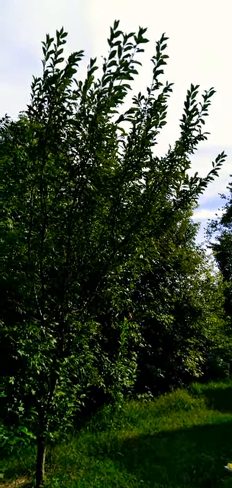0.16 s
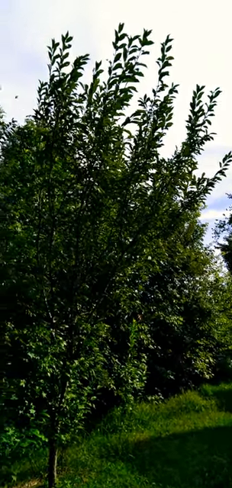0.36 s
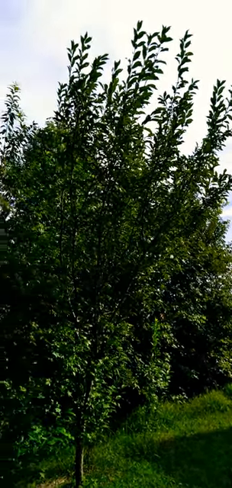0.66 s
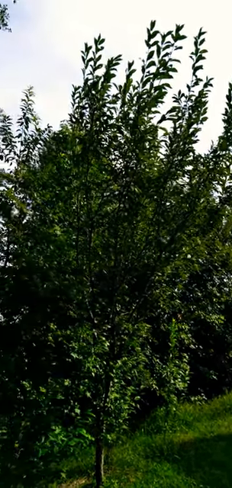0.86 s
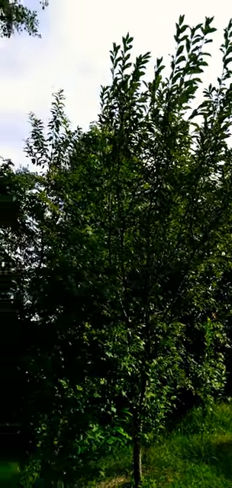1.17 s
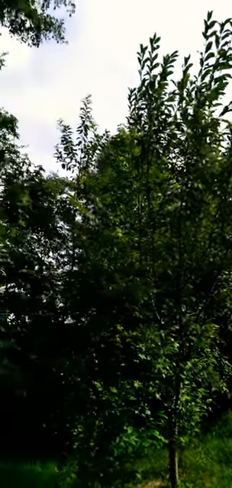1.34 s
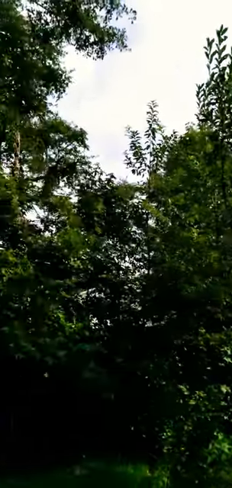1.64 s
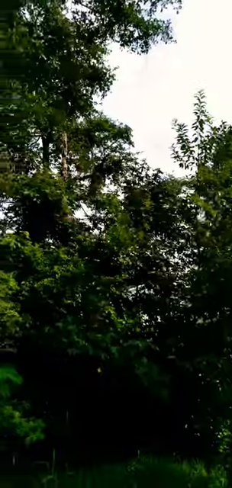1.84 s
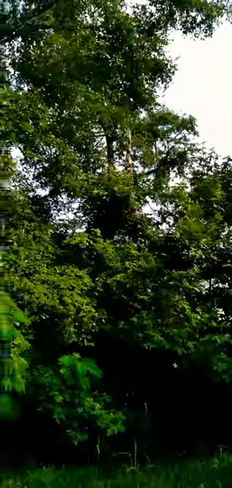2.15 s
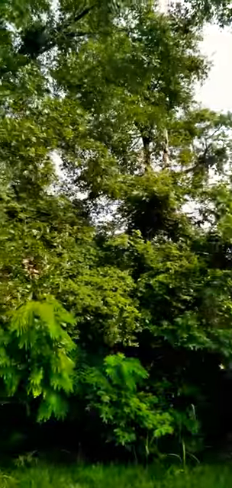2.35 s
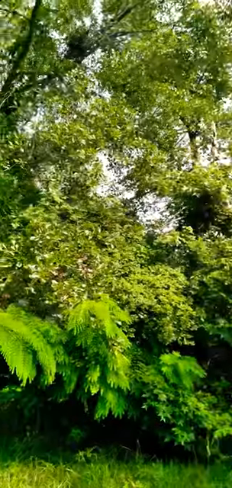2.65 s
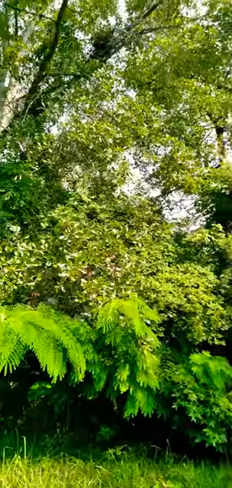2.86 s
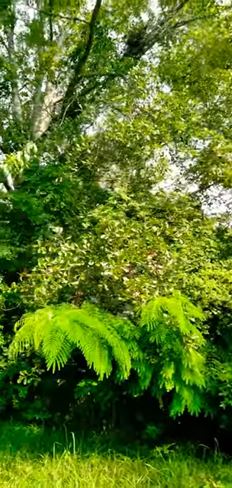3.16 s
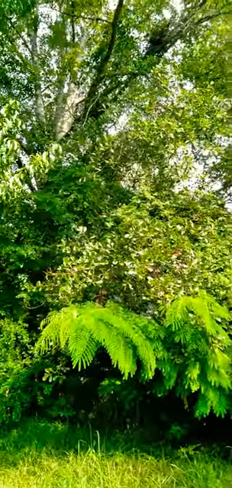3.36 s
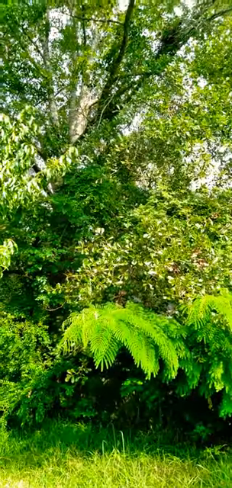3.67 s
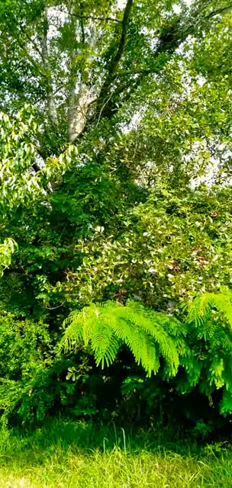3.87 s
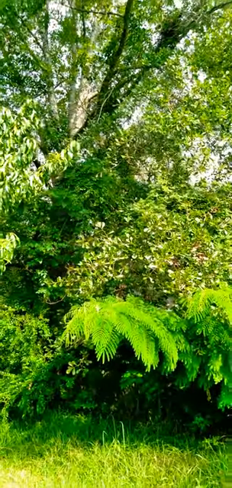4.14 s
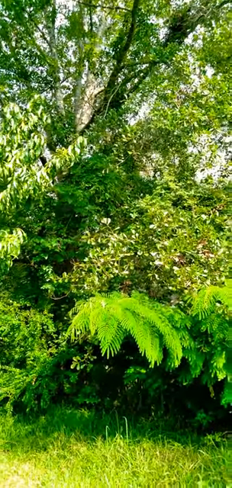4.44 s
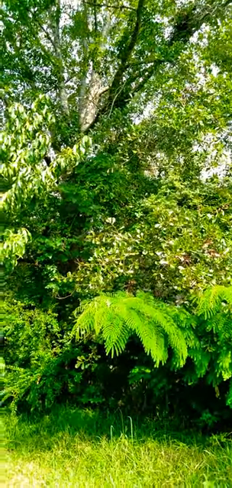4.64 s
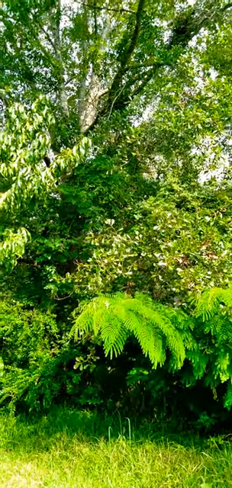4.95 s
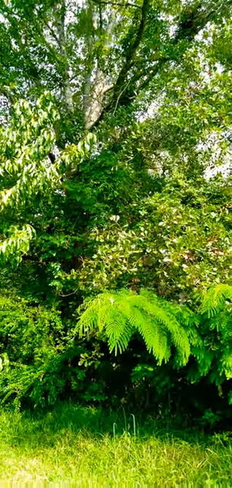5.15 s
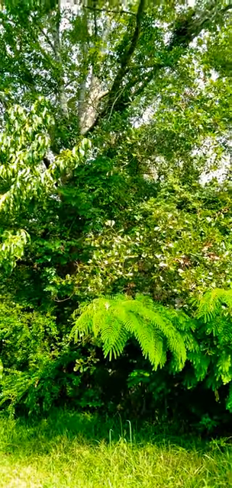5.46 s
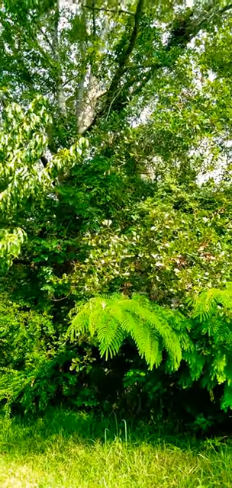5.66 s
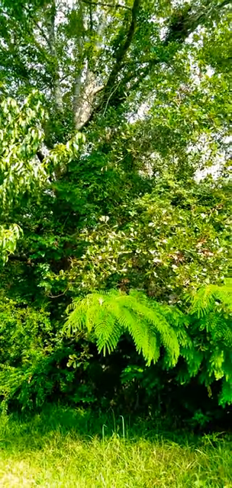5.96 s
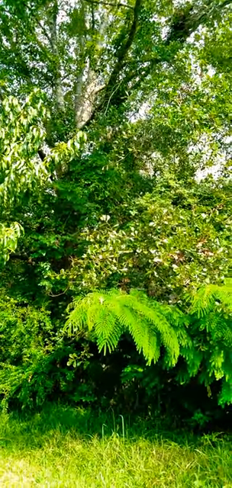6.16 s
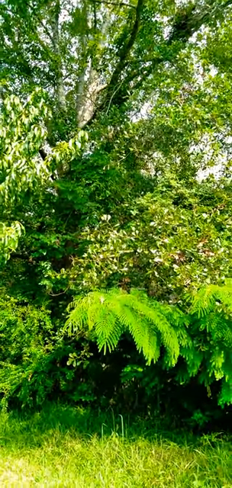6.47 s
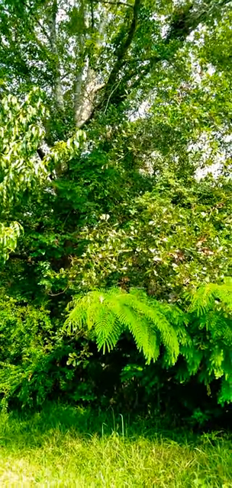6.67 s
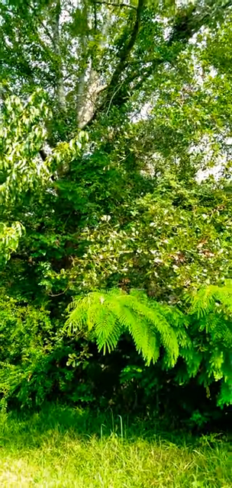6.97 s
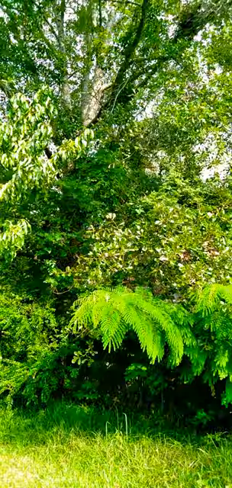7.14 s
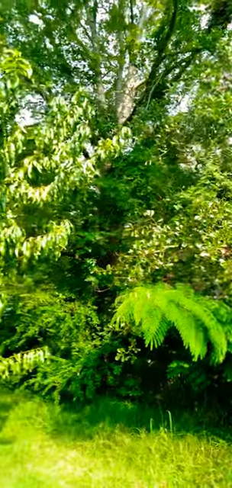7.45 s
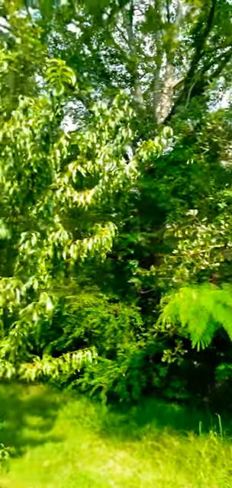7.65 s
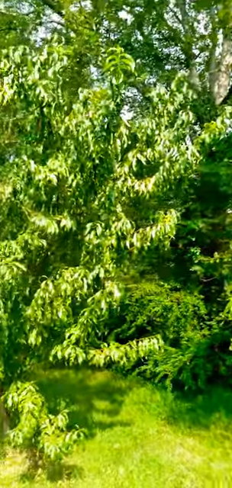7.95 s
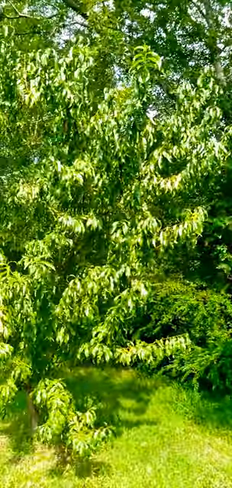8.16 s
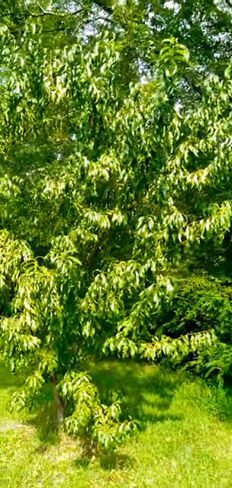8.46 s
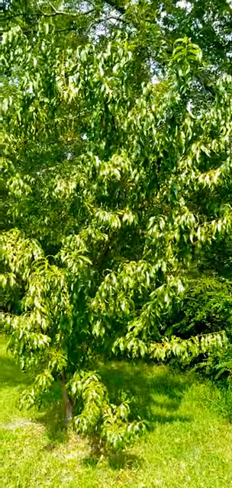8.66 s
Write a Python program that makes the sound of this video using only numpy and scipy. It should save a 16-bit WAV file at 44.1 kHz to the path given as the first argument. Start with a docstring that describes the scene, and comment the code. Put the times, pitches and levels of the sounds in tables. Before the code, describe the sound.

Cicadas buzz and pulse shrilly outdoors, with three distant dog barks, faint bird chirps and a low traffic rumble.

```python
"""A near cicada buzzes loudly over a summer lawn and stops; two shrill ones pulse on near 8 kHz,
a chorus fades behind them and a fast, even singer swells up as a pitched whine.
Their tymbal ribs buckle in trains of clicks that ring the abdomen and echo off the foliage.
Far off, a dog barks three times, a small bird chirps and traffic rumbles under the hiss of leaves."""
import sys
import numpy as np
from scipy import signal
from scipy.fft import rfft, irfft, next_fast_len
from scipy.io import wavfile
from scipy.ndimage import uniform_filter1d, map_coordinates

SR = 44100
rng = np.random.default_rng(int(sys.argv[2]) if len(sys.argv) > 2 else 0)


def wav_out(sig):
    """Save sig, one row per channel (or a flat mono array), as 16-bit PCM at SR to the path in sys.argv[1]."""
    wavfile.write(sys.argv[1], SR, np.round(np.clip(np.atleast_2d(sig).T, -1, 1) * 32767).astype(np.int16))


N = 388521

# the even singer's pace: time_s, clicks_per_s
EVEN_PACE = [(5, 250), (7.2, 250), (7.8, 249.4), (8.3, 248.8), (8.81, 248.2)]
# resonances of the second shrill singer's abdomen: pitch_hz, width_hz, gain_db
SECOND_ABDOMEN = [(8160, 139, -4), (8230, 370, -10.5)]
# hard strokes that stand out of the shrill song: time_s, peak_db
HARD_STROKES = [(3.928, -38), (4.286, -36), (5.580, -36), (5.766, -33), (5.9695, -36), (6.186, -30),
                (6.2535, -34), (7.133, -38), (7.1523, -36)]
CHORUS_PAN_DB = 7.5


def amp(db):
    """Decibels to gain."""
    return 10 ** (np.asarray(db) / 20)


def unit(x):
    """Scale to rms 1; a stereo pair by the mean of its sides."""
    return x / np.sqrt(np.mean(np.atleast_2d(x).mean(0) ** 2) + 1e-20)


def levelled(x):
    """Hold each side at a steady strength of 1, keeping its fast pulsing."""
    power = np.abs(uniform_filter1d(x ** 2, SR // 8, axis=-1))
    return x / np.sqrt(power + 1e-20)


def sides(pan_db):
    """Constant-power gains, the left pan_db above the right."""
    gains = amp(np.array([pan_db, -pan_db]) / 2).reshape(2, -1)
    return gains / np.sqrt(np.mean(gains ** 2, axis=0))


def along(points, hz):
    """Read (Hz, value) points on a log axis."""
    point_hz, values = np.transpose(points)
    return np.interp(np.log(hz + 1), np.log(point_hz + 1), values)


def clock():
    """Seconds at each sample."""
    return np.arange(N) / SR


def curves(rows):
    """One value per sample for each column after the time."""
    times, *columns = np.transpose(rows)
    return [np.interp(clock(), times, column) for column in columns]


def ramp(start, length):
    """A ramp from 0 at start to 1 after length seconds."""
    return np.clip((clock() - start) / length, 0, 1)


def fade(start, end):
    """A ramp from 1 at start to 0 at end."""
    return np.clip((end - clock()) / (end - start), 0, 1)


def bell(peak_s, spread_s):
    """A smooth hump of height 1."""
    return np.exp(-.5 * ((clock() - peak_s) / spread_s) ** 2)


def wobble(rate):
    """A smooth random curve, rate knots a second."""
    knots = rng.standard_normal(int(N * rate / SR) + 4)
    at = np.arange(0, len(knots), 1 / 10)
    return np.interp(clock() * rate, at, map_coordinates(knots, [at]))


def phase_of(hz):
    """The running phase of a moving pitch, in radians."""
    return 2 * np.pi * np.cumsum(hz) / SR


def filtered(x, response):
    """Filter x by a gain that depends on frequency."""
    size = next_fast_len(N + SR // 2)
    return irfft(rfft(x, size) * response(np.fft.rfftfreq(size, 1 / SR)), size)[..., :N]


def coloured(x, points):
    """Equalise x with a (Hz, dB) curve."""
    return filtered(x, lambda hz: amp(along(points, hz)))


def ring(x, modes):
    """Pass x through (pitch_hz, width_hz, gain_db) resonances of alternating sign."""
    return filtered(x, lambda hz: sum(
        (-1) ** k * amp(db) * 1j * hz * width / (centre ** 2 - hz ** 2 + 1j * hz * width)
        for k, (centre, width, db) in enumerate(modes)))


def band(centre_hz, width_hz):
    """Narrow noise of rms 1."""
    noise = rng.standard_normal(N)
    return unit(filtered(noise, lambda hz: np.exp(-(1.22 * (hz - centre_hz) / width_hz) ** 2)))


def rush(spectrum, likeness):
    """Stereo noise of rms 1; likeness sets how closely the sides agree at each frequency."""
    def mid_and_side(hz):
        angle = np.arccos(np.clip(along(likeness, hz), -1, 1)) / 2
        return amp(along(spectrum, hz)) * [np.cos(angle), np.sin(angle)]
    mid, side = filtered(rng.standard_normal((2, N)), mid_and_side)
    return unit(np.array([mid + side, mid - side]))


def clicks(times, sizes):
    """Impulses placed between samples."""
    at = times[:, None] * SR
    index = np.floor(at).astype(int) + np.arange(-7, 9)
    pulses = np.sinc(index - at) * np.sinc((index - at) / 8) * sizes[:, None]
    return np.bincount(np.clip(index, 0, N).ravel(), pulses.ravel(), N + 1)[:N]


def beats(rate):
    """The times at which a running rate completes each cycle."""
    turns = np.cumsum(rate * np.ones(N)) / SR
    return np.interp(np.arange(1, int(turns[-1])), turns, clock())


def foliage(x, t60, wet_db):
    """Direct sound, reaching the left first, plus echoes that change as the leaves sway."""
    t = np.arange(int((t60 + .01) * SR)) / SR
    sway = np.pi * clock() + wobble(1.986)
    out = np.array([x, np.roll(x, 4)])
    for weight in (np.cos(sway), np.sin(sway)):
        tail = rng.standard_normal((2, len(t))) * amp(-60 * t / t60)
        echoes = signal.fftconvolve(x[None], tail / np.linalg.norm(tail[0]), axes=1)[:, :N]
        out = out + amp(wet_db) * weight * echoes
    return out


def summer_air():
    """A steady bed of leaves and far insects, centred in the lows and wide in the highs."""
    # tone of the bed: frequency_hz, gain_db
    colour = [(120, -10), (200, -12), (350, -7), (550, -5.5), (1100, -6.5), (1700, -10.5), (3000, -11),
              (5000, -12.5), (7000, -17), (8100, 11.5), (9200, -1), (10500, -16.5), (12500, -23),
              (15500, -16)]
    # its stereo image: frequency_hz, left_right_likeness
    likeness = [(200, 0.94), (600, 0.96), (1200, 0.76), (2500, 0), (8000, 0)]
    return amp(-58 + .6 * wobble(2.95)) * rush(colour, likeness) * sides(1.8)


def traffic():
    """Road rumble swells with each vehicle; one far engine pulls up in pitch again and again."""
    # passing vehicles: peak_s, spread_s, rise_db
    passes = [(3.85, 0.38, 4.5), (5.95, 0.39, 9.5), (7.5, 0.21, 5), (8.28, .14, 8)]
    # engine pulls: start_s, length_s, start_hz, end_hz, level_db
    pulls = [(5.548, 0.39, 84, 100, -54), (5.832, 0.67, 105, 109.1, -56.5), (6.899, 1, 134, 138.4, -65.5),
             (7.853, 0.69, 137, 141.8, -60.5)]
    # tone of the road: frequency_hz, gain_db
    colour = [(15, -60), (27, -31), (42, -10), (58, -2.5), (90, 3.5), (130, -3), (185, -15), (230, -13),
              (330, -39), (600, -62)]
    rev_s, attack_s, release_s = 0.28, 0.17, 0.22
    rumble_db = -70 + 2 * wobble(9) + sum(db * bell(s, spread) for s, spread, db in passes)
    engine = np.zeros(N)
    for s, length, start_hz, end_hz, db in pulls:
        pitch_hz = start_hz + (end_hz - start_hz) * ramp(s, rev_s)
        phase = phase_of(pitch_hz * (1 + 0.014 * wobble(40)))
        load = ramp(s, attack_s) * fade(s + length - release_s, s + length)
        engine += amp(db + 2.0 * wobble(22)) * load * np.sin(phase)
    rumble = amp(rumble_db) * rush(colour, likeness=[(40, 0.61), (70, 0.95), (200, 0.9)])
    return rumble * sides(1.1) + engine * sides(4.8)


def bumps():
    """Soft low thuds, a few cycles each."""
    # dull thuds: peak_s, spread_s, pitch_hz, level_db
    thuds = [(5.83, 0.0054, 150, -45.5), (6.26, 0.0053, 108, -41.5), (7.09, 0.0055, 163, -59)]
    return sides(9) * sum(amp(db) * bell(s, spread) * np.sin(2 * np.pi * hz * (clock() - s))
                          for s, spread, hz, db in thuds)


def far_calls():
    """Distance smears each faint call into a soft, narrow swell."""
    # trills and hoots: start_s, length_s, pitch_hz, width_hz, level_db
    calls = [(3.13, 0.9, 3210, 120, -71), (3, 2.1, 2540, 270, -74.5), (2.96, 1.24, 1120, 260, -74),
             (6.5, 0.31, 1380, 120, -74), (8.45, 1, 785, 100, -67), (3.85, 0.303, 256, 26, -75),
             (8.08, 0.43, 226, 25, -69), (8.4, 0.63, 231, 9.2, -80)]
    out = np.zeros(N)
    for s, length, pitch_hz, width_hz, db in calls:
        swell = np.abs(np.sin(np.pi * ramp(s, length))) ** 0.4
        out += amp(db) * swell * band(pitch_hz, width_hz)
    return out * sides(7.4)


def bird():
    """Short rising whistles with a soft echo."""
    # whistles: start_s, length_s, start_hz, end_hz, relative_db
    chirps = [(5.181, 0.029, 5840, 6550, -64), (5.261, 0.035, 5880, 6240, -66),
              (5.365, 0.034, 5620, 5900, -65), (5.857, 0.036, 5880, 7700, -55.5),
              (6.52, 0.055, 7550, 7840, -51), (8.08, .05, 7150, 7750, -55)]
    out = np.zeros(N)
    for s, length, start_hz, end_hz, db in chirps:
        progress = ramp(s, length)
        pitch_hz = start_hz + (end_hz - start_hz) * progress
        out += amp(db) * np.sin(np.pi * progress) * np.sin(phase_of(pitch_hz))
    return foliage(out, t60=0.3, wet_db=5.5) * sides(3) * amp(2.0)


def dog():
    """Each far bark opens gruff and low, breaks up to a hoarse howl and echoes among the trees."""
    # barks: start_s, length_s, pitch_hz, level_db, gruff_db, hoarseness (share of pitch), rasp_db
    barks = [(2.047, 0.23, 936.5, -51, -17.5, 0.03, -7), (2.659, 0.28, 869, -52.5, -6, 0.026, -4.5),
             (4.599, 0.24, 825.3, -51.5, 5.5, .04, -2)]
    # the muzzle's bands of rasp: centre_hz, width_hz, gain_db
    muzzle = [(985, 98, -7.5), (1540, 300, -16)]
    howl_lag_s, howl_attack_s = .022, 0.024
    echo_colour = [(550, -3.0), (900, 1.0), (1800, -6)]
    rasp = sum(amp(db) * band(hz, width) for hz, width, db in muzzle)
    gruff = band(558, 84)
    out = np.zeros((2, N))
    for s, length, pitch_hz, db, gruff_db, hoarseness, rasp_db in barks:
        arch = np.abs(np.sin(np.pi * ramp(s + howl_lag_s, length)))
        phase = phase_of(pitch_hz * (.965 + .04 * arch + hoarseness * wobble(330)))
        throat = np.sin(phase) + amp(-9) * arch ** 2 * np.sin(2 * phase) + amp(rasp_db) * rasp
        howl = arch ** 0.24 * ramp(s + howl_lag_s, howl_attack_s) * throat
        opening = amp(gruff_db) * ramp(s, 0.012) * fade(s + 0.049, s + 0.17) * gruff
        early = foliage(howl + opening, t60=.2, wet_db=4)[0]
        late = foliage(early, t60=1.5, wet_db=1.0) - early
        bark = early + coloured(late, echo_colour)
        narrowed = unit(0.44 * bark + 0.21 * bark[::-1])
        out += amp(db) * np.sqrt(length * SR / N) * narrowed
    return out * sides(2.7)


def rattle(rate, jitter_s, size_db, smear_s):
    """A fast, uneven train of rib clicks; foliage smears each into a new short burst on each side."""
    times = beats(rate * (1 + .004 * wobble(6.6)))
    chance = rng.standard_normal((len(times), 2))
    energy = clicks(times + jitter_s * chance[:, 0], amp(size_db * chance[:, 1]) ** 2)
    smeared = signal.lfilter([1], [1, -np.exp(-1 / (smear_s * SR))], energy)
    return unit(np.sqrt(np.abs(smeared)) * rng.standard_normal((2, N)))


def throb(rate_hz=13.9, peak_s=1.92):
    """The slow pumping of an abdomen, between -1 and 1."""
    return np.cos(2 * np.pi * rate_hz * (clock() - peak_s))


def chorus():
    """Farther cicadas, gently throbbing and blurred by the trees, hold and then fade to a faint bed."""
    # tone of the chorus: frequency_hz, gain_db
    colour = [(2000, -26), (2700, -14.5), (3500, -13), (4000, -12), (4700, -10.5), (5150, -5), (6000, -1),
              (6800, -2.5), (7500, 2.5), (8500, -21), (9500, -14), (11000, -18.5), (12400, -15),
              (14000, -31), (15500, -63)]
    level_db = -53.5 - 14 * ramp(2.94, 2.03)
    ribs = rattle(rate=430, jitter_s=0.00031, size_db=3.5, smear_s=0.0041)
    voice = unit(coloured(ribs + amp(-1.5) * foliage(ribs[1], t60=.08, wet_db=12), colour))
    low = filtered(voice, lambda hz: hz < 5400)
    high = filtered(voice, lambda hz: hz > 8300)
    middle = voice - low - high
    pumping = amp(1.6 * fade(2.4, 3.1) * throb())
    return ((low * pumping + middle) * sides(CHORUS_PAN_DB) + high * sides(-1.5)) * amp(level_db)


def brief_rings():
    """First single cicadas in the chorus, later a shifting high sheen on the even singer's buzz."""
    # brief narrow rings: peak_s, spread_s, pitch_hz, level_db
    rings = [(1.74, .05, 6400, -56), (2.38, .06, 6200, -57), (2.7, .1, 6770, -56), (2.72, 0.053, 6200, -63),
             (2.65, .28, 5880, -63), (4.06, 0.053, 5080, -70.5), (6.5, .25, 9200, -68),
             (6.98, .15, 9900, -64), (7.3, .12, 9680, -66), (8.65, .15, 10400, -70)]
    ringing = sum(amp(db) * bell(s, spread) * band(hz, 67) for s, spread, hz, db in rings)
    return ringing * amp(2 * throb()) * sides(CHORUS_PAN_DB)


def throbber():
    """Behind the loud buzz, one cicada rings on in soft throbs and dies out."""
    ribs = rattle(rate=220, jitter_s=0.00018, size_db=-2.5, smear_s=0.0019)
    voice = levelled(ring(ribs, [(5100, 63, 5), (4600, 400, -5)]))
    return voice * amp(-60.5 + 6.3 * throb()) * bell(2.05, .46) * sides(7.4)


def whine(phase):
    """Harmonics of the click rate swell in turn; each wavers on its own path through the leaves."""
    # ringing lines: harmonic (rounded for pitch), peak_s, spread_s, level_db
    lines = [(18, 8.6, 0.11, -68), (19, 6.2, 0.42, -73.5), (19.9, 7.1, 0.19, -74), (20, 9, 0.46, -74),
             (21, 7.93, .1, -75), (23, 8.8, 0.75, -65), (24.2, 7.98, .22, -58.5), (24, 8.7, 0.18, -68),
             (25, 8.4, 0.17, -67), (25.2, 8.3, 0.3, -70), (26, 6.95, 1.7, -63), (27, 8.1, 0.65, -60),
             (28, 8.8, .55, -63.5), (37, 6.8, 0.56, -66.5), (38, 8.75, .25, -60), (42, 6.8, 1.1, -69),
             (43, 9.3, 0.7, -74), (44, 8.2, 0.57, -67), (45, 8.5, 0.65, -72)]
    # their placing: frequency_hz, left_over_right_db
    pan = [(4500, -4), (4750, -13), (6200, 3), (6500, -27), (6750, 2), (9200, -21)]
    out = np.zeros((2, N))
    for harmonic, s, spread, db in lines:
        waver = 0.12 * wobble(45) + rng.uniform(0, 2 * np.pi) + rng.normal(0, 0.66, (2, 1))
        level = amp(db + 2.5 * wobble(4.8)) * bell(s, spread)
        tone = np.sqrt(2) * np.sin(round(harmonic) * phase + waver)
        out += level * tone * sides(along(pan, harmonic * EVEN_PACE[0][1]))
    return ramp(start=5.07, length=0.85) * out


def even_singer():
    """Very regular clicks make a comb of lines; a thin whine opens into a full, smooth buzz."""
    # the rasp's swell: time_s, level_db
    swell = [(5.4, -74), (6.3, -74), (7.1, -59.5), (8.3, -59), (8.81, -54)]
    # its tone: frequency_hz, gain_db
    colour = [(3000, -40), (4500, -12.5), (5400, -5), (5900, 3), (6750, 3.5), (7300, 4.5), (9400, 3.5),
              (9750, 1.5), (10800, 6), (11300, -7.5), (11900, -32), (13000, -32), (14000, -9), (15500, -22)]
    # its placing: frequency_hz, left_over_right_db
    pan = [(4500, -12), (6000, -12), (7500, 28), (9400, -12), (11000, -7), (14000, -6)]
    rate, = curves(EVEN_PACE)
    rasp_db, = curves(swell)
    phase = phase_of(rate * (1 + 0.000423 * wobble(25)))
    ribs = rattle(rate, jitter_s=.00006, size_db=1, smear_s=.003)
    times = beats(rate * (1 + 0.000391 * wobble(25)))
    # every third click is stronger, which adds lines between the main ones
    accents = 1 + 0.99 * np.cos(2 * np.pi * np.arange(len(times)) / 3)
    ringing = unit(foliage(clicks(times, accents), t60=.05, wet_db=11.0))
    rasp = coloured(ribs + ringing, colour)
    rasp = unit(filtered(rasp, lambda hz: sides(along(pan, hz))))
    return whine(phase) + amp(rasp_db) * rasp


def strokes(rate, limp):
    """Stroke times of two tymbals that buckle in turn, a little unevenly."""
    times = beats(rate * (1 + .012 * wobble(5)))
    times = times + limp / rate * (np.arange(len(times)) % 2)
    return times + .0016 * rng.standard_normal(len(times))


def shrill(times, abdomen, gap_s, step_db, droop, wet_db, ribs):
    """Within a stroke each rib rings the abdomen a little lower, its level changed by step_db."""
    voice = np.zeros(N)
    for rib in range(ribs):
        chance = rng.standard_normal((len(times), 2))
        sizes = amp(step_db * rib + 2.0 * chance[:, 1])
        pops = clicks(times + gap_s * rib + 0.000398 * chance[:, 0], sizes)
        voice += ring(pops, np.array(abdomen) * [1 - droop * rib, 1, 1])
    colour = [(5000, -43), (6800, -19), (7350, 0.5), (8400, 1.0), (9000, -23), (11000, -19)]
    return levelled(coloured(foliage(voice, t60=.04, wet_db=wet_db), colour))


def placed(voice, level_db):
    """A shrill singer leans further left the louder it sings over its own echoes."""
    return voice * amp(level_db) * sides(10 + 0.9 * (level_db + 48))


def first_singer():
    """Tymbal strokes shrill beside the loud buzz, then drop to a slowly fading murmur."""
    # resonances of its abdomen: pitch_hz, width_hz, gain_db
    abdomen = [(7490, 160, -6), (7790, 144, -4)]
    level_db = -38.5 - 3 * fade(0, 0.62) - 13.5 * ramp(1.24, 0.63) - 2.5 * ramp(3.2, 0.39)
    times = strokes(rate=56.5, limp=0.15)
    voice = shrill(times, abdomen, gap_s=0.003, step_db=-4.5, droop=0.0022, wet_db=-0.5, ribs=4)
    return placed(voice, level_db) * fade(1.6, 17.0)


def swelling(rest_db=-54.5, flutter_db=.5):
    """The second singer's level in dB: each swell climbs from rest, rounds off and sinks back."""
    # swells of the song: peak_s, rise_s, fall_s, height_db
    swells = [(2.25, .15, 0.39, 3.5), (2.92, 0.23, 0.25, 7), (3.269, 0.2, 0.25, 9.5),
              (3.62, 0.28, 0.66, 10), (4.32, 0.28, 0.47, 8.5), (4.82, 0.47, 0.17, 10.5),
              (5.45, 0.5, 0.32, 10.5), (6.15, 0.99, 0.71, 14.5), (7.15, 0.55, .4, 6),
              (7.66, 0.45, 0.41, 10), (8.43, 0.36, 0.59, 12.5)]
    heights = [db * np.sin(np.pi / 2 * ramp(s - rise, rise) * fade(s, s + fall))
               for s, rise, fall, db in swells]
    return rest_db + np.max(heights, axis=0) + flutter_db * wobble(8)


def drifting(voice, pitch_hz):
    """The second singer's ring slides to its note."""
    shift = np.exp(1j * phase_of(pitch_hz - SECOND_ABDOMEN[0][0]))
    return np.real(signal.hilbert(voice, next_fast_len(N))[:, :N] * shift)


def second_singer():
    """Each stroke opens on a high note and closes on a lower one; the song ducks at each hard stroke."""
    # its two drifting notes: time_s, opening_hz, closing_hz, closing_relative_db
    notes = [(2.2, 8050, 8020, 0), (4.3, 8230, 8060, -0.5), (4.9, 8230, 8060, -2), (5.15, 8150, 7900, -3),
             (5.5, 8180, 7890, 1.5), (5.8, 8200, 7900, -6.5), (6.4, 8165, 7900, -6.5), (6.9, 8380, 8100, 2),
             (7.35, 8300, 8020, 3), (7.85, 8450, 8050, -1), (8.25, 8230, 7950, -2), (8.55, 8280, 7930, -4),
             (8.81, 8270, 7920, 7)]
    high_hz, low_hz, low_db = curves(notes)
    opens = strokes(rate=59.6, limp=0.08)
    closes = opens + .006
    high = shrill(opens, SECOND_ABDOMEN, gap_s=.0028, step_db=-0.3, droop=0.0035, wet_db=3.5, ribs=3)
    low = shrill(closes, SECOND_ABDOMEN, gap_s=.003, step_db=1.5, droop=0.002, wet_db=4, ribs=2)
    voice = (drifting(high, high_hz) + amp(low_db) * drifting(low, low_hz)) / np.hypot(1, amp(low_db))
    duck = amp(-15 * sum(bell(s - .003, .004) for s, _ in HARD_STROKES))
    return placed(voice, swelling()) * duck * ramp(start=0.81, length=0.92)


def snaps(pitch_hz=8100):
    """A hard stroke rings the abdomen for an instant."""
    envelope = sum(amp(db) * bell(s, 0.0016) for s, db in HARD_STROKES)
    return envelope * np.sin(2 * np.pi * pitch_hz * clock()) * sides(11.0)


def loud_buzz():
    """Dense rib clicks throb with the abdomen; the buzz loses its lows as it runs down, then stops."""
    # narrow resonances: pitch_hz, width_hz, gain_db
    modes = [(5300, 25, -5), (5630, 21, -3), (5790, 24, -2), (5960, 25, 0), (6400, 17, -2), (6430, 22, -12),
             (5020, 39, -2.5), (3390, 95, -3.5)]
    # tone of the buzz: frequency_hz, gain_db
    colour = [(2200, -36.5), (2550, -12.5), (3000, -4.5), (3350, -3), (4200, -0.5), (5300, 2.5), (6300, 5),
              (7000, 3), (8200, -11), (9000, -14), (9550, -8), (10800, -17), (12200, -8), (14300, -16.5),
              (14800, -33)]
    # its placing: frequency_hz, left_over_right_db
    pan = [(2700, 8), (3500, 1), (6500, 4), (8500, 8), (10300, -10), (12200, -6), (14000, 0)]
    sag_db_per_s, stop_s, stop_db_per_s = 4.5, 1.225, 72
    level_db = -33 - sag_db_per_s * clock() - stop_db_per_s * np.maximum(clock() - stop_s, 0)
    pumping = amp(0.48 * np.sin(2 * np.pi * 23.0 * clock()))
    ribs = rattle(rate=910, jitter_s=0.00017, size_db=-0.5, smear_s=0.00074) * pumping
    rings = sum(ring(ribs[0], [mode]) for mode in modes)
    echoes = foliage(ribs[0], t60=0.087, wet_db=17.5) * amp(-23.5)
    voice = coloured(ribs + rings + echoes, colour)
    voice = filtered(voice, lambda hz: sides(along(pan, hz)))
    thin = coloured(voice, [(2850, -11.0), (3200, 1.0)])
    voice = thin + (voice - thin) * fade(0.052, 0.99)
    faint_tail = amp(-58.5) * fade(1.85, 3.3)
    return voice / voice.std() * (amp(level_db) + faint_tail)


def scene():
    """The cicadas and their far neighbours over the summer air."""
    air = summer_air()
    near_cicadas = loud_buzz() + first_singer() + second_singer() + snaps()
    other_cicadas = chorus() + brief_rings() + throbber() + even_singer()
    distance = dog() + bird() + far_calls() + traffic() + bumps()
    return air + distance + other_cicadas + near_cicadas


def record(dry, top_hz=15700):
    """The microphone loses the deepest bass, and nothing passes above the band limit."""
    thinned = coloured(dry, [(20, -26), (32, 1), (42, -11), (52, 0.5)])
    return filtered(thinned, lambda hz: hz < top_hz)


dry = scene()
out = record(dry)
wav_out(out)
```